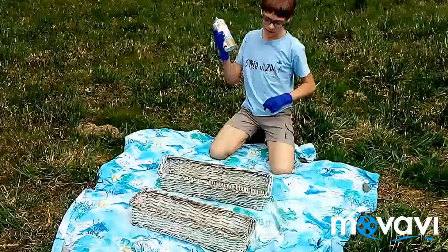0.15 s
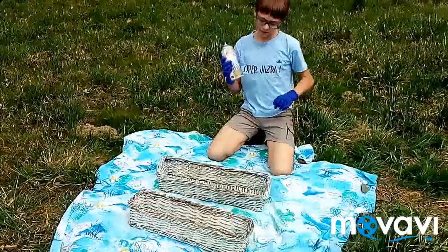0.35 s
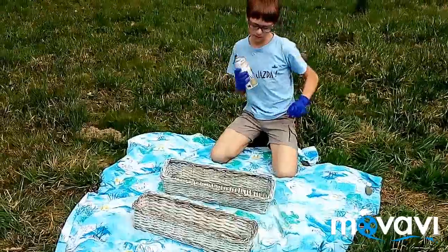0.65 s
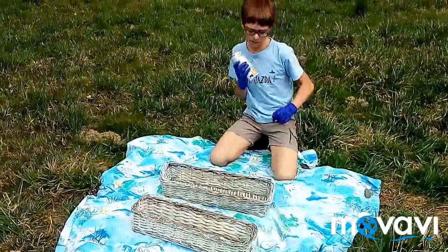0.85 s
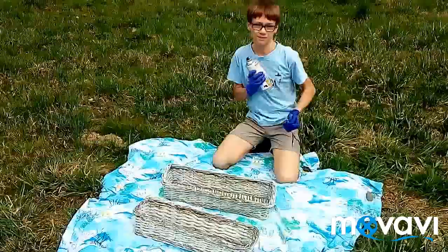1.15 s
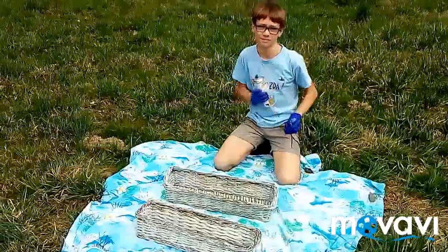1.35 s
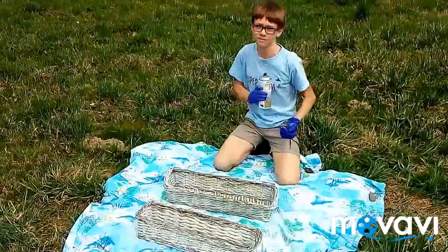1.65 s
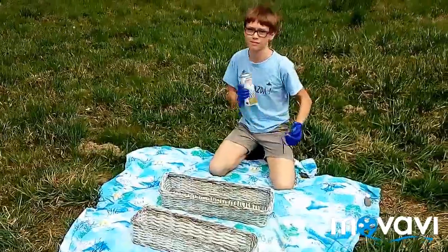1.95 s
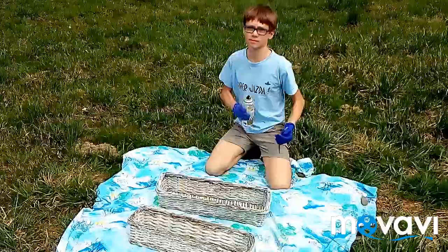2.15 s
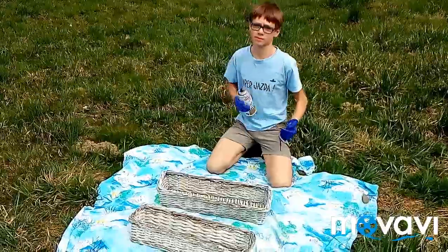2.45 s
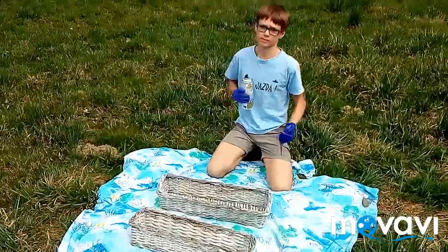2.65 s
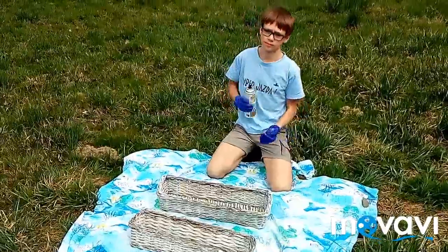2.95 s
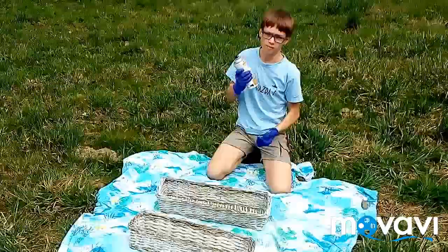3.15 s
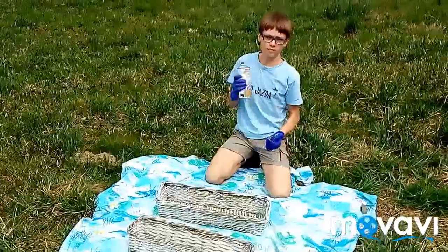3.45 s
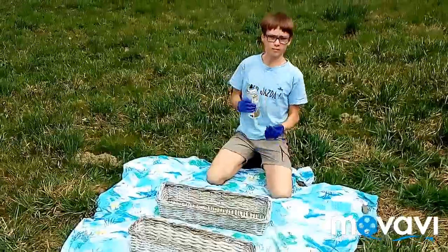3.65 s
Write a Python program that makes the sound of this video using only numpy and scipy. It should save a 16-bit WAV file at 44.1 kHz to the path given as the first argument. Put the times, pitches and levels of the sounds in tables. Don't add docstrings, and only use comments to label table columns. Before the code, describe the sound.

Quiet open meadow with faint distant engine hum and a songbird's alternating whistles; almost at once a nearby aerosol can is shaken, its steel ball rattling in irregular quick bursts, dry and close, until the end.

```python
import sys
import numpy as np
from scipy import signal
from scipy.fft import rfft, irfft
from scipy.io import wavfile
from scipy.ndimage import uniform_filter1d

SR = 44100
rng = np.random.default_rng(int(sys.argv[2]) if len(sys.argv) > 2 else 0)


def boost_factor(decibels):
    exponent = np.asarray(decibels, float) / 20
    return 10 ** exponent


def put_to_file(sound):
    columns = np.atleast_2d(sound).T
    safe = np.clip(columns, -1, 1)
    whole_steps = np.round(safe * 32767)
    wavfile.write(sys.argv[1], SR, whole_steps.astype(np.int16))


N = 165375

# pitch_hz [Hz], level_db [dB per Hz]
AIR_COLOUR = [(35, -13.5), (90, -0.5), (400, -8), (5500, -9), (9000, -25), (13300, -33.5), (14800, -19.5),
              (16300, -35)]
# pitch_hz [Hz], level_db [dB peak]
ENGINE_ORDERS = [(79, -83), (101, -77), (121, -81), (160, -87), (200, -87)]
# settled_hz [Hz], glide_s [s], length_s [s]
SONG_NOTES = [(3200, .018, .15), (4570, .007, .062)]
# start_s [s], level_db [dB]
BIRD_CALLS = [
    (.062, -72),
    (.266, -56),
    (.565, -62),
    (.766, -53),
    (1.07, -63),
    (1.272, -56),
    (1.582, -65),
]
# start_s [s], level_db [dB]
PAINT_SLAPS = [
    (0.17, -29),
    (0.665, -25),
    (0.928, -26.5),
    (1.005, -25.5),
    (1.112, -25),
    (1.409, -20),
    (1.472, -27),
    (3.339, -25.5),
]
# time_s [s], level_db [dB]
ROLL_VIGOUR = [(0, -70), (.35, -64.5), (.5, -65), (1.25, -67), (1.9, -58.5), (2.9, -59.5), (3.62, -61),
               (3.66, -55.5)]
# start_s [s], crack_db [dB], knock_db [dB]
BALL_STRIKES = [(0.1839, -31.5, -91), (0.2, -28.5, -83), (0.2232, -33, -65), (0.3898, -23, -61),
                (0.4007, -25, -52), (0.4117, -27, -49), (0.4145, -43, -70), (0.4182, -29.5, -69),
                (0.4319, -26.5, -47.5), (0.4387, -36, -73), (0.4662, -29, -65), (0.4859, -23, -53),
                (0.4895, -30, -44), (0.5049, -24, -53), (0.5141, -27, -39.5), (0.525, -22, -49),
                (0.54, -27, -33), (0.591, -14, -32), (0.6262, -32.5, -49.5), (0.774, -20.5, -43),
                (0.7928, -14, -46.5), (0.8184, -25, -42), (0.8327, -33.5, -80), (0.854, -31, -32.5),
                (0.8659, -35, -32), (0.92, -16.5, -36.5),
                (0.931, -20.5, -37.5), (0.9369, -43, -41.5), (0.979, -39, -47.5), (0.9998, -38.5, -36),
                (1.0336, -18.5, -63), (1.0398, -14, -66), (1.0496, -32, -77), (1.059, -24, -66),
                (1.0681, -16.5, -69), (1.105, -33.5, -76), (1.14, -31, -29.5), (1.1565, -31, -31),
                (1.1595, -34, -36.5), (1.19, -23.5, -28.5), (1.193, -31, -35), (1.203, -19, -34),
                (1.3157, -42, -49), (1.321, -35, -43), (1.329, -21, -62), (1.332, -16, -39),
                (1.3356, -24.5, -71), (1.36, -22.5, -44.5), (1.399, -36, -34), (1.423, -35, -43),
                (1.4417, -38, -32), (1.4511, -20, -29.5),
                (1.4886, -23, -42), (1.5044, -37, -41), (1.6329, -16, -37.5), (1.645, -39, -58),
                  (1.656, -28.5, -55), (1.6595, -37, -39.5), (1.7301, -19, -29), (1.7712, -28.5, -41.5),
                  (1.794, -35, -37.5), (1.9089, -23.5, -49), (1.919, -23, -49), (1.9345, -29.5, -55),
                  (1.9505, -36.5, -34.5), (2.0178, -18, -33), (2.0706, -37, -39.5), (2.2156, -23.5, -51),
                  (2.223, -26.5, -45.5), (2.2537, -31, -28.5), (2.2957, -19, -38), (2.305, -41, -41),
                  (2.3124, -23.5, -38), (2.4044, -38.5, -42), (2.4601, -17, -80), (2.485, -21, -73),
                  (2.503, -27.5, -63), (2.5457, -43, -33.5),
                (2.5885, -18, -35), (2.6374, -37.5, -36.5), (2.684, -32, -46), (2.7971, -23, -37),
                (2.816, -32, -47), (2.82, -52, -40), (2.8848, -21.5, -35), (2.931, -26, -37.5),
                (3.0593, -21.5, -47), (3.0784, -27, -67), (3.088, -35.5, -43), (3.0964, -27.5, -42),
                (3.1766, -19, -32.5), (3.1862, -19, -45), (3.2061, -31, -36.5), (3.223, -44, -53),
                (3.2351, -29.5, -35.5), (3.268, -35, -38), (3.3405, -15.5, -33), (3.368, -34, -43),
                (3.3748, -24, -40.5), (3.384, -27, -54), (3.3902, -30.5, -75), (3.4613, -21, -36.5),
                (3.4871, -18, -36.5), (3.5465, -35, -55)]
# start_s [s], crack_db [dB], knock_db [dB]
LIGHT_BUMPS = [(0.2148, -36, -57), (0.2353, -34, -56), (0.3444, -37.5, -71), (0.3556, -39, -71),
               (0.4216, -39, -49.5), (0.4439, -38, -68), (0.453, -39, -42), (0.5508, -36, -42.5),
               (0.5585, -34, -33), (0.583, -49, -51), (0.6447, -46, -46.5), (0.7345, -42, -48.5),
               (0.8768, -41, -39), (0.938, -37, -53), (1.4121, -44, -42), (1.4599, -38, -32.5),
               (1.5226, -46, -43), (1.5404, -41, -49), (1.6053, -41.5, -41), (1.681, -45, -47),
               (1.6963, -44, -44), (1.7126, -39.5, -40.5), (1.722, -42, -49), (1.785, -42, -47),
               (1.8598, -38, -42.5), (1.9576, -43, -42), (1.9748, -40.5, -42), (1.9886, -39, -46),
               (1.9943, -43, -46), (2.035, -36, -44), (2.0476, -41, -43), (2.0556, -45, -53),
               (2.093, -42, -55), (2.1014, -40.5, -45), (2.2415, -44, -50), (2.2633, -41, -55),
               (2.332, -37.5, -42),
               (2.3458, -41, -52), (2.3826, -45, -53), (2.5281, -44, -41.5), (2.5343, -42, -38),
              (2.555, -42, -50), (2.563, -35, -44), (2.5711, -43, -36), (2.6175, -40, -42),
              (2.705, -40, -45), (2.7348, -49, -46), (2.759, -51, -49), (2.767, -52, -45),
              (2.8252, -45, -47), (2.8354, -41, -42), (2.8476, -37, -40), (2.8595, -45, -55),
              (2.864, -42, -46), (2.8686, -40, -44), (2.9132, -42, -55), (2.9501, -38, -42),
              (2.9562, -51, -47), (2.974, -52, -47), (2.9815, -46, -51), (3.116, -38, -46),
              (3.1349, -37.5, -44), (3.2414, -56, -54), (3.2877, -44, -53), (3.4008, -34, -41),
              (3.4136, -43, -46), (3.4207, -35.5, -39), (3.4301, -39.5, -45), (3.5, -47, -48),
              (3.5277, -43.5, -52), (3.5648, -42, -52), (3.5806, -47, -53), (3.6055, -42, -50),
              (3.6165, -41, -42.5)]
# time_s [s], tilt_db [dB per octave over 6 kHz]
FACING_TILT = [(.2, 3), (.6, 0.5), (1.1, -5), (1.5, 3), (1.9, 2.5), (2.2, 14.5), (2.45, -4.5), (2.8, 9.5),
               (3.35, 2.5), (3.46, 6)]
# pitch_hz [Hz], level_db [dB]
SHELL_COLOUR = [(2050, -17.5), (2700, -8.5), (4800, 2.5), (6700, -5), (8500, -19), (12500, -30.5),
                (14800, -16), (16500, -43)]
# pitch_hz [Hz], level_db [dB]
BENDING_MODES = [(2550, -9), (3650, -8.5), (4600, -5), (5400, -4.5), (6600, -9.5)]
# pitch_hz [Hz], level_db [dB]
HOLLOW_MODES = [(640, -8), (860, -3.5), (1150, -7.5), (1450, 3), (1680, 2)]
# pitch_hz [Hz], level_db [dB]
WASH_COLOUR = [(450, -9.5), (850, 11.5), (1150, -14.0), (1620, 2.5)] + SHELL_COLOUR[:5] + [(11000, -20)]

HIT_T = np.arange(int(0.04 * SR)) / SR
SNAP_S = 0.000752
CONTACT_RISE = np.minimum(HIT_T / SNAP_S, 1)


def at_hz(points, hz):
    point_hz, point_db = np.transpose(points)
    return np.interp(np.log(hz), np.log(point_hz), point_db)


def drift(rate_hz):
    knots = rng.standard_normal(1000)
    return np.interp(np.arange(N) / SR * rate_hz, np.arange(1000), knots)


def coloured(points):
    hz = np.maximum(np.arange(N // 2 + 1) * SR / N, 1)
    x = irfft(rfft(rng.standard_normal(N)) * boost_factor(at_hz(points, hz)), N)
    return x / x.std()


def add(out, start_s, sounds):
    for start, sound in zip((np.asarray(start_s) * SR).astype(int), sounds):
        out[start:start + len(sound)] += sound


def chance(count):
    return rng.standard_normal((count, 1))


def meadow():
    t = np.arange(N) / SR
    hum = np.zeros(N)
    for hz, level_db in ENGINE_ORDERS:
        swell = boost_factor(level_db + 2.5 * drift(4.58))
        hum += swell * np.sin(2 * np.pi * (hz * t + 0.26 * drift(4)))
    return hum + boost_factor(-65 + drift(1.97)) * coloured(AIR_COLOUR)


def bird():
    out, waver = np.zeros(N + SR), drift(63)
    t = np.arange(int(0.15 * SR)) / SR
    for k, (start_s, level_db) in enumerate(BIRD_CALLS):
        settled_hz, glide_s, length_s = SONG_NOTES[k % 2]
        pitch_hz = settled_hz * (1 + 0.14 * np.exp(-t / glide_s))
        pitch_hz = pitch_hz + 50 * waver[int(start_s * SR):][:len(t)]
        edges = np.clip(np.minimum(t, length_s - t) / 0.006, 0, 1)
        whistle = np.sin(2 * np.pi * np.cumsum(pitch_hz) / SR)
        add(out, [start_s], [boost_factor(level_db + 4 - 45 * t) * edges * whistle])
    lag = np.arange(int(0.35 * SR)) / SR
    trees = rng.standard_normal(len(lag)) * boost_factor(-40 - 60 * lag / 0.7) * (lag > 0.02)
    direct = out[:N] * boost_factor(4 * drift(180))
    return direct + signal.fftconvolve(out[:N], trees)[:N]


def paint_slaps():
    out = np.zeros(N + SR)
    push = boost_factor(1 - 60 * HIT_T / 0.0059) * np.sin(2 * np.pi * 290 * HIT_T) * np.minimum(HIT_T / 0.005, 1)
    start_s, level_db = np.transpose(PAINT_SLAPS)
    add(out, start_s + 0.00416, boost_factor(level_db)[:, None] * push)
    return signal.sosfilt(signal.butter(2, 130, "high", fs=SR, output="sos"), out[:N])


def rolling(strike_s, knock_db):
    stir = np.zeros(N)
    stir[(strike_s * SR).astype(int)] = boost_factor(0.14 * (knock_db + 7))
    stir = signal.lfilter([1], [1, -boost_factor(-60 / 0.084 / SR)], stir)
    vigour_db = np.interp(np.arange(N) / SR, *np.transpose(ROLL_VIGOUR)) + 10 * np.log10(0.5 + stir)
    ticks_per_s = 200
    tick_s = 0.18 + np.cumsum((0.3 - 1.2 * np.log(rng.random(700))) / ticks_per_s)
    tick_s = tick_s[tick_s < 3.64]
    size, crack_luck, knock_luck = rng.random((3, len(tick_s)))
    size_db = vigour_db[(tick_s * SR).astype(int)] - 7 * np.log(size + 0.24)
    ticks = ball(tick_s, size_db + 6.5 - 8 * crack_luck, size_db + 6 - 12 * knock_luck)
    return ticks + boost_factor(vigour_db - 13 + 7.7 * drift(87)) * coloured(WASH_COLOUR)


def contact_colour(start_s, balance_db):
    count, hz = len(start_s), np.fft.rfftfreq(len(HIT_T), 1 / SR) + 1
    place = np.clip(7 * np.log2(hz / 1500), 0, 25)
    patches = np.array([np.interp(place, np.arange(26), row) for row in rng.standard_normal((count, 26))])
    facing = np.interp(start_s, *np.transpose(FACING_TILT))[:, None] * np.log2(np.maximum(hz, 6000) / 6000)
    tilt = 0.3 * chance(count) - 0.15 * np.clip(balance_db + 11, -25, 15)
    tilt_db = tilt * np.log2(np.maximum(hz, 2000) / 4700)
    level_db = at_hz(SHELL_COLOUR, hz) + facing + 3.5 * np.minimum(patches, 1.2) + tilt_db
    return hz, boost_factor(level_db) * (hz > 700)


def snap(hz, colour):
    phase = 2 * chance(len(colour)) - 2 * np.pi * hz * SNAP_S
    pulse = irfft(colour * np.exp(1j * phase), len(HIT_T)) * boost_factor(-60 * abs(HIT_T - SNAP_S) / (8 * SNAP_S))
    return pulse / abs(pulse).max(axis=1, keepdims=True)


def shell_modes(colour, length):
    noise = rng.standard_normal((len(colour), len(HIT_T)))
    modes = irfft(colour * rfft(noise), len(HIT_T))
    decay = boost_factor(-60 * HIT_T / 0.013 / length) + boost_factor(-25.5 - 60 * HIT_T / 0.077)
    return modes / modes.std(axis=1, keepdims=True) * decay * CONTACT_RISE


def bending(balance_db, length):
    out, count = 0, len(balance_db)
    for mode_hz, mode_db in BENDING_MODES:
        pitch_hz = mode_hz * (1 + 0.034 * chance(count))
        deep_db = np.clip(balance_db + 20, -25, 5) * max(np.log2(4600 / mode_hz), 0)
        gain = boost_factor(mode_db + deep_db + 8 * np.clip(chance(count), -2, 1))
        out = out + gain * np.sin(2 * np.pi * pitch_hz * HIT_T)
    return out * boost_factor(-60 * HIT_T / 0.014 / length) * CONTACT_RISE


def hollow_knock(knock_db):
    out, count = 0, len(knock_db)
    for mode_hz, mode_db in HOLLOW_MODES:
        pitch_hz = mode_hz * (1 + 0.055 * chance(count))
        gain = boost_factor(knock_db + 0.5 + mode_db + 5 * np.clip(chance(count), -2, 1))
        out = out + gain * np.sin(2 * np.pi * pitch_hz * HIT_T)
    swell = 1 - np.exp(-(HIT_T / 0.0022) ** 2)
    return out * boost_factor(-60 * HIT_T / 0.015) * swell


def ball(start_s, crack_db, knock_db):
    out = np.zeros(N + SR)
    crack_db, knock_db = crack_db[:, None], knock_db[:, None]
    balance_db = knock_db - crack_db
    hz, colour = contact_colour(start_s, balance_db)
    length = boost_factor(2 * chance(len(start_s)))
    hardness = boost_factor(8 + 0.11 * (crack_db + 23.5))
    crack = hardness * snap(hz, colour) + shell_modes(colour, length) + bending(balance_db, length)
    loudest = uniform_filter1d(2 * crack ** 2, size=30, axis=1).max(axis=1, keepdims=True)
    crack = crack * boost_factor(crack_db - 3) / np.sqrt(loudest)
    add(out, start_s, crack + hollow_knock(knock_db))
    return out[:N]


def scene():
    strikes = np.transpose(BALL_STRIKES)
    bumps = np.transpose(LIGHT_BUMPS)
    contact_s, _, contact_knock_db = np.hstack([strikes, bumps])
    background = meadow() + bird()
    paint = paint_slaps() + rolling(contact_s, contact_knock_db)
    return (background + paint + ball(*bumps) + ball(*strikes))[None]


def low_pass(x):
    return signal.sosfilt(signal.butter(12, 16800, fs=SR, output="sos"), x)


def record(dry):
    cut = signal.sosfilt(signal.cheby2(10, 60, 16800, fs=SR, output="sos"), dry)
    return low_pass(cut)


dry = scene()
out = record(dry)
put_to_file(out)
```